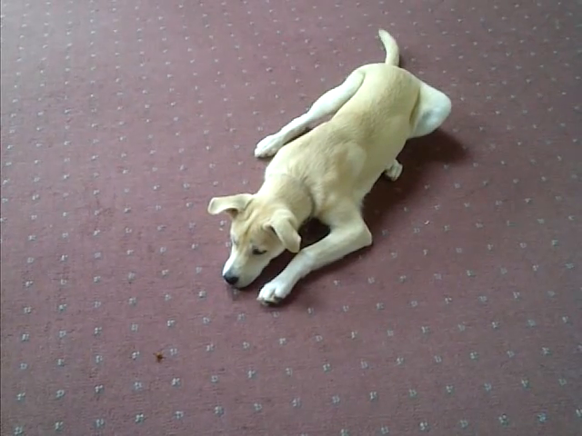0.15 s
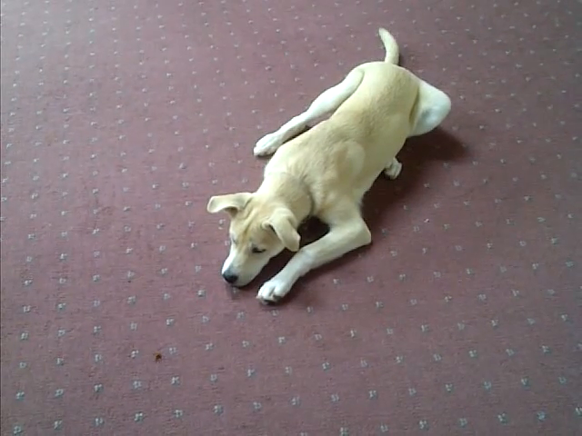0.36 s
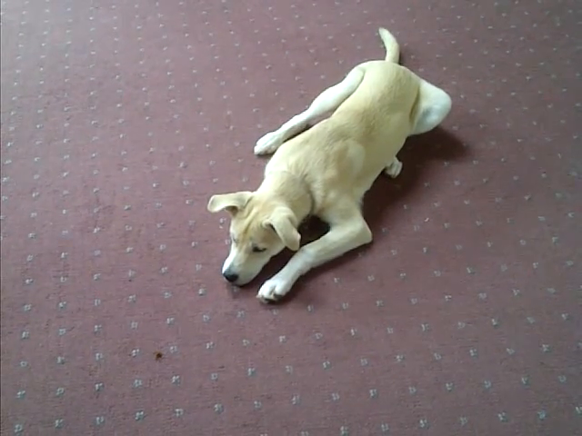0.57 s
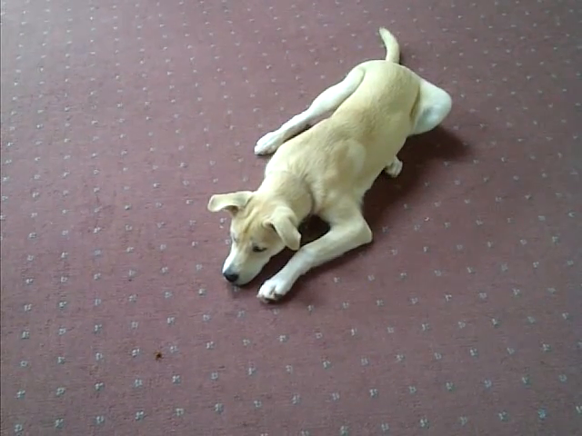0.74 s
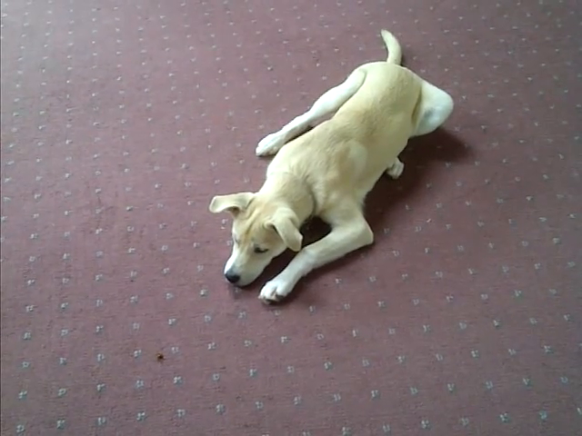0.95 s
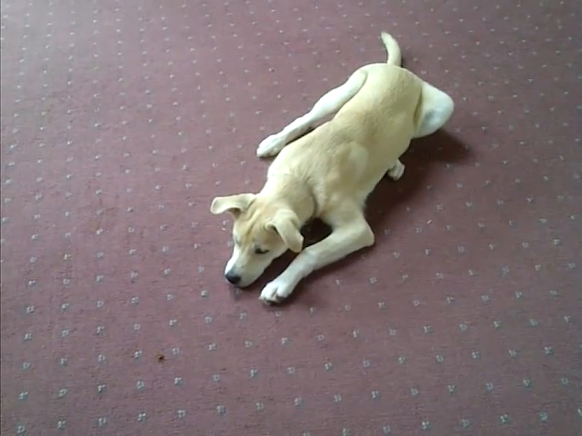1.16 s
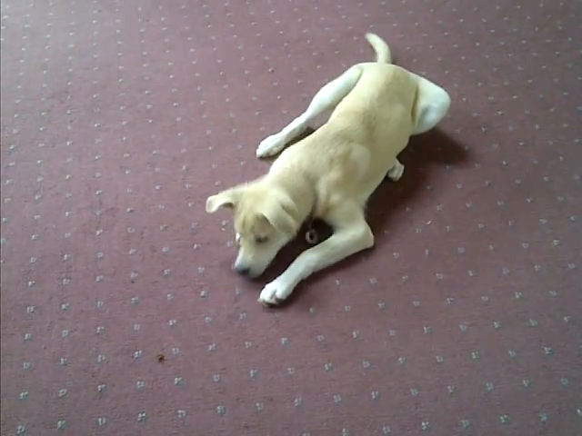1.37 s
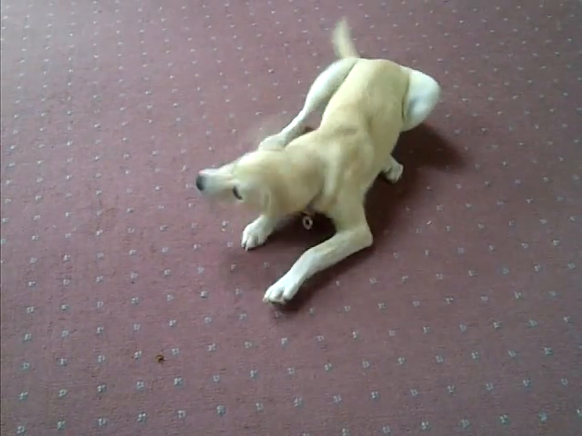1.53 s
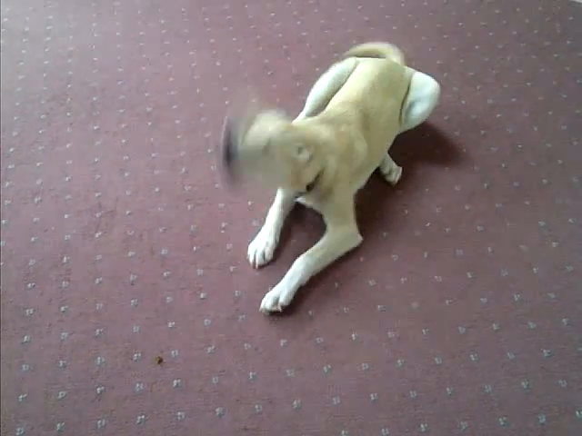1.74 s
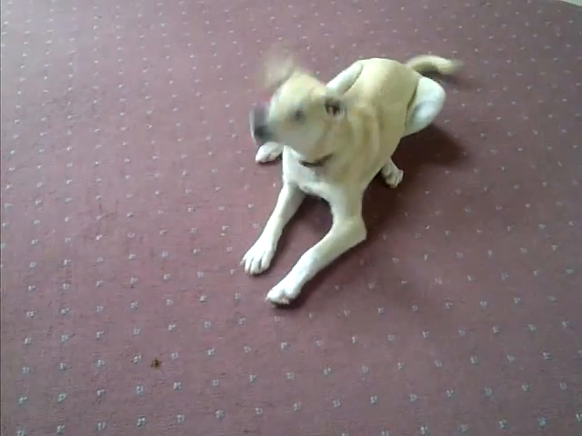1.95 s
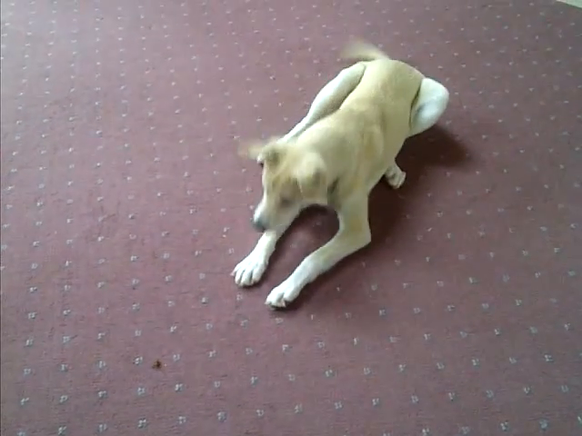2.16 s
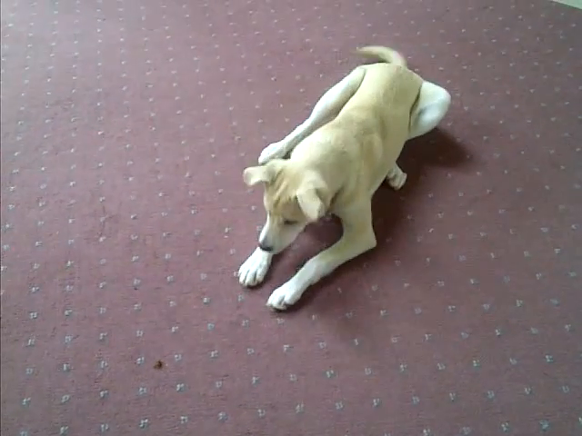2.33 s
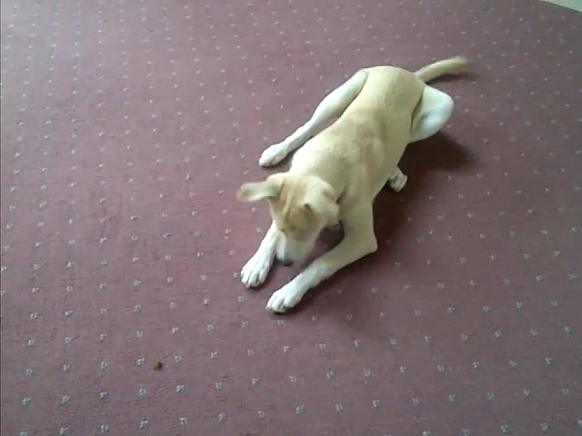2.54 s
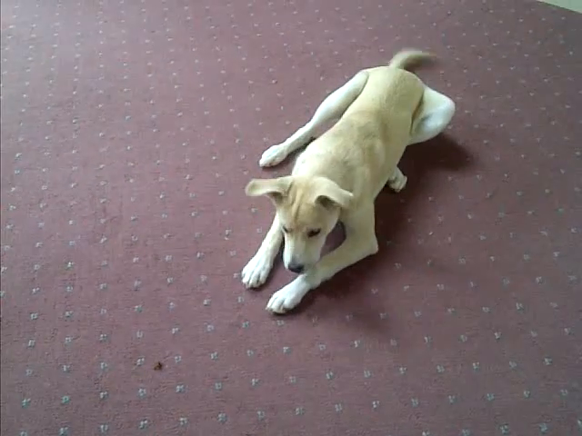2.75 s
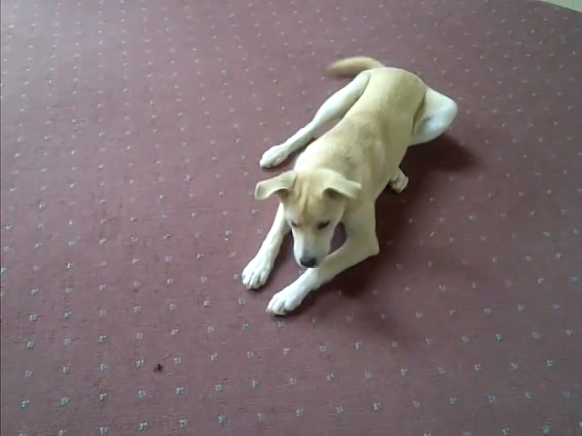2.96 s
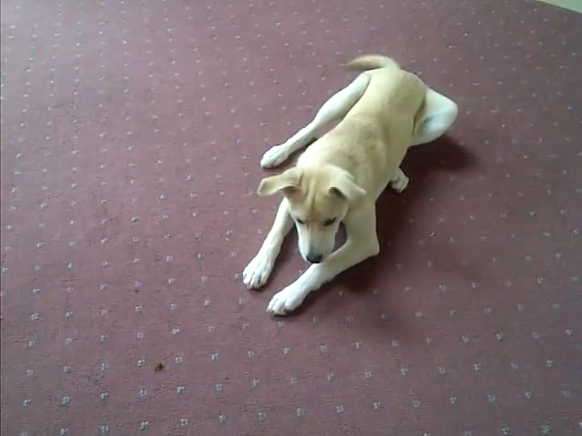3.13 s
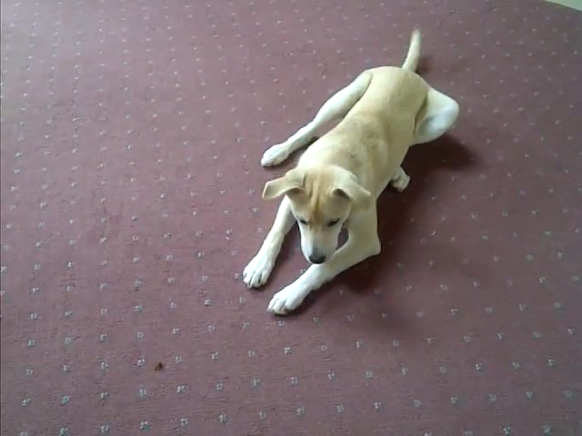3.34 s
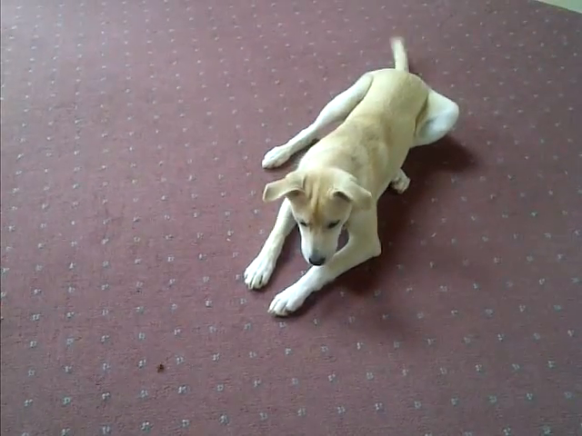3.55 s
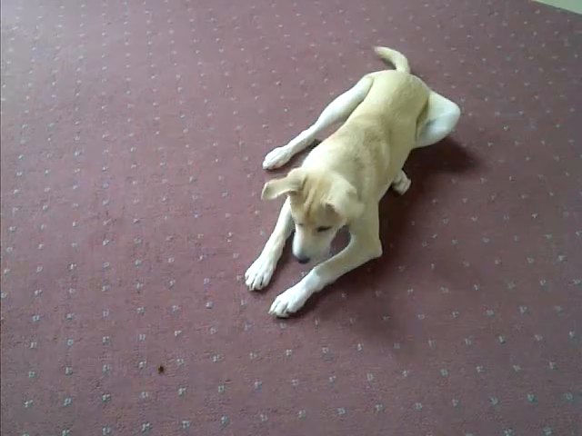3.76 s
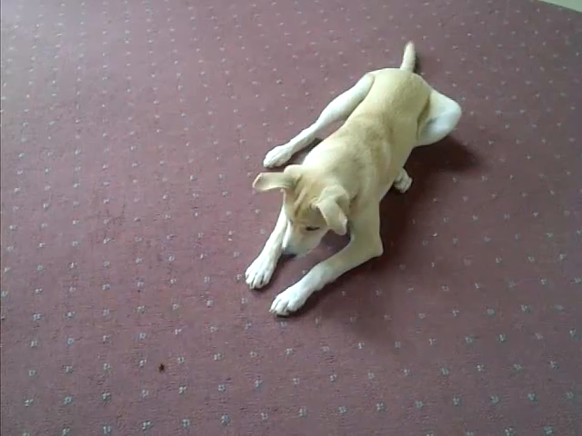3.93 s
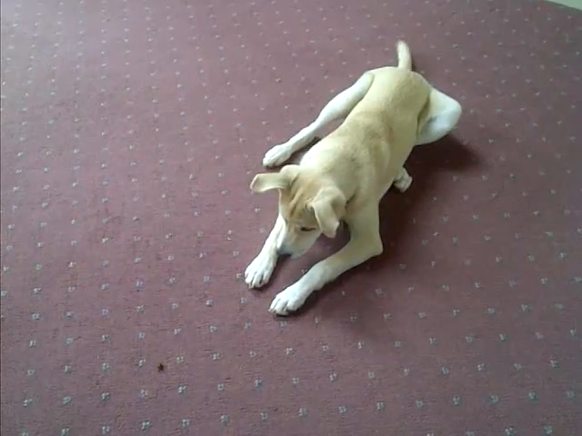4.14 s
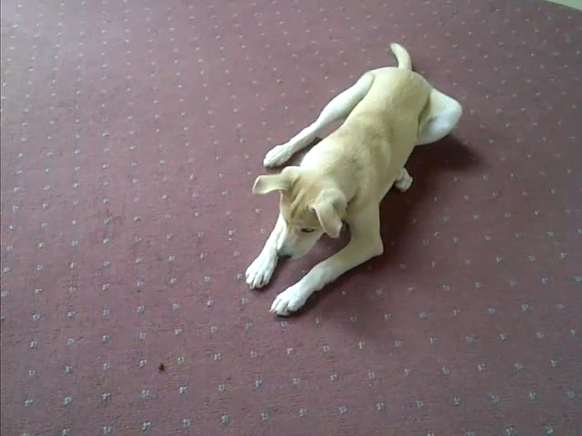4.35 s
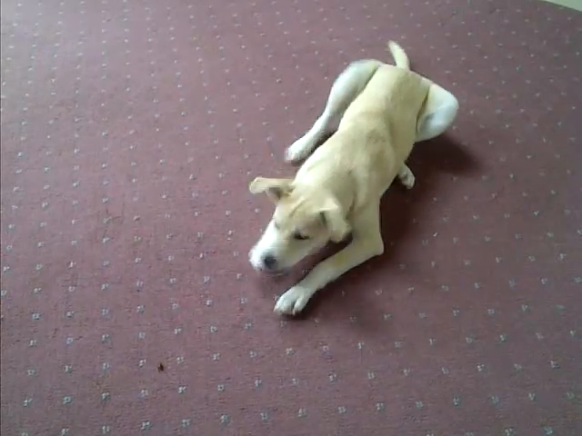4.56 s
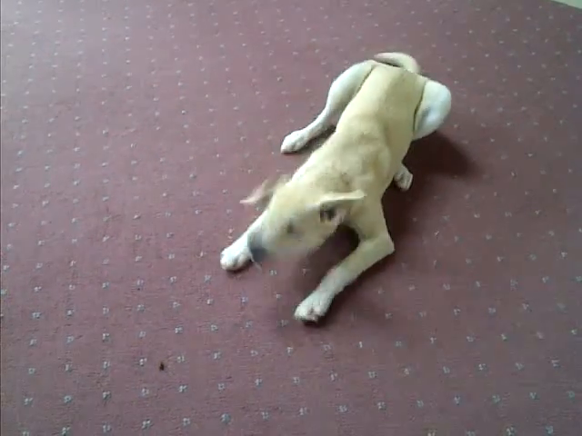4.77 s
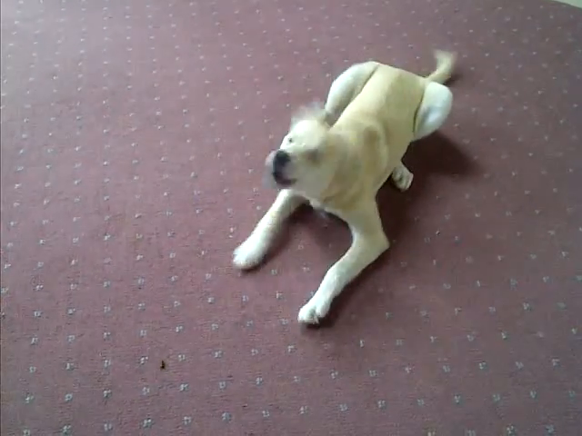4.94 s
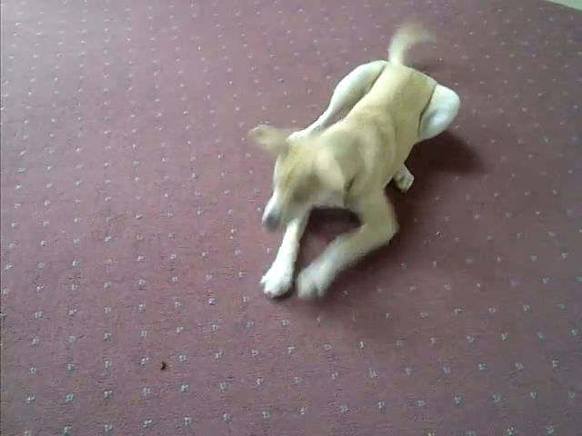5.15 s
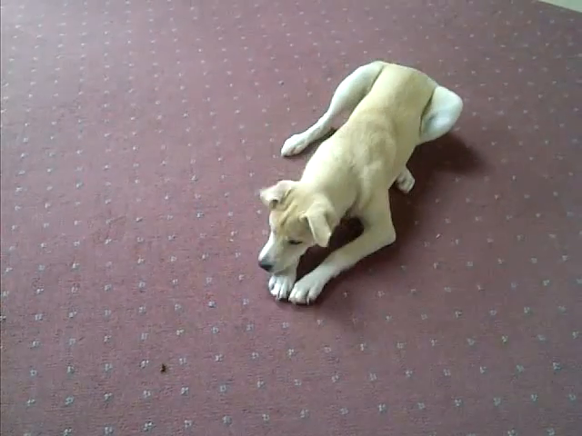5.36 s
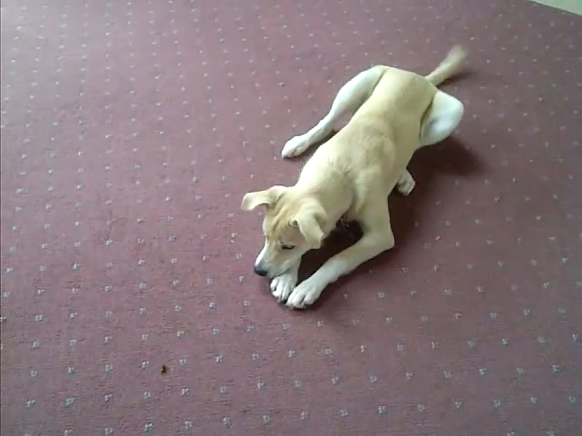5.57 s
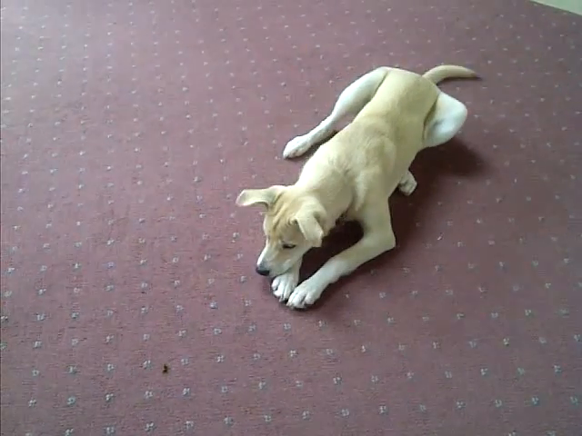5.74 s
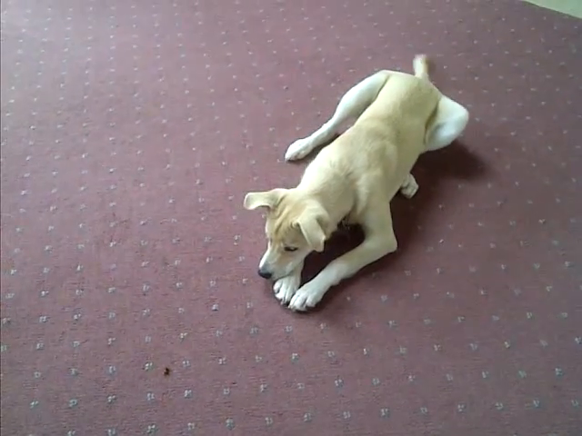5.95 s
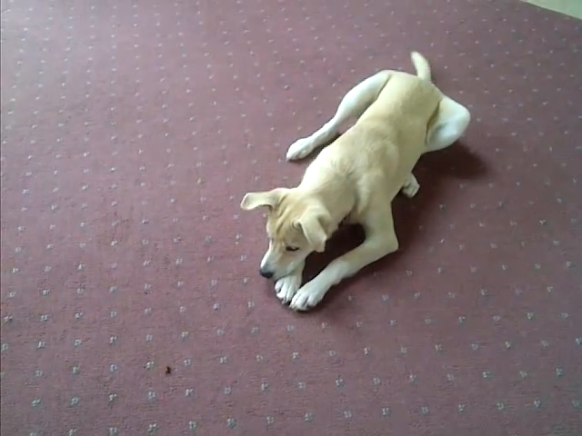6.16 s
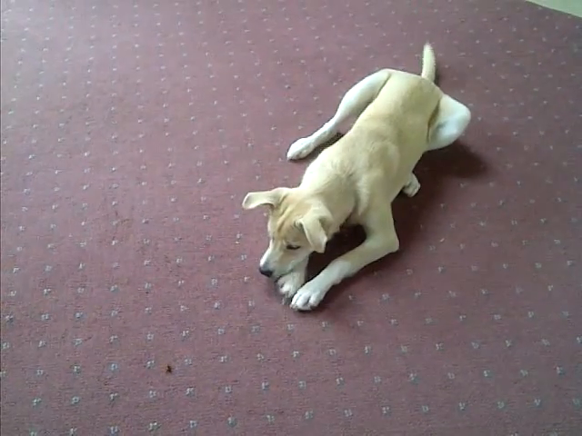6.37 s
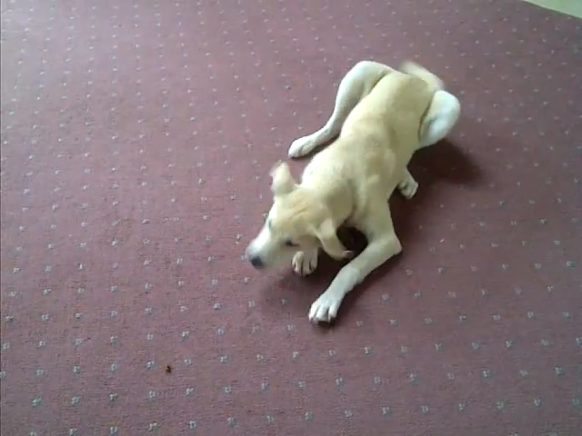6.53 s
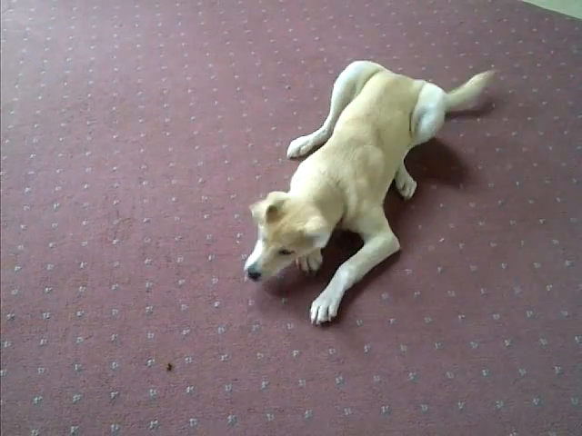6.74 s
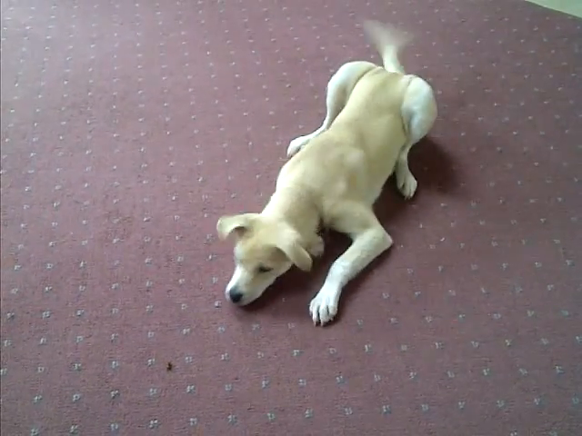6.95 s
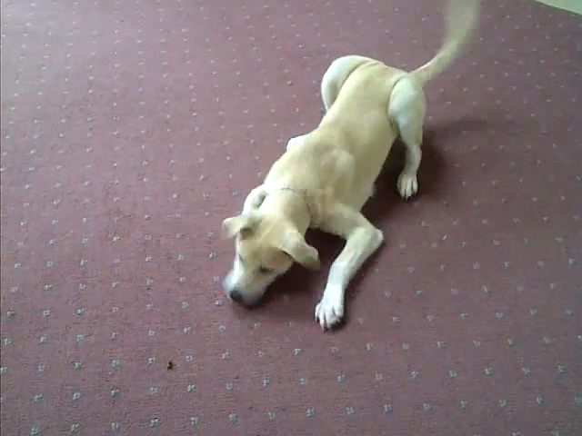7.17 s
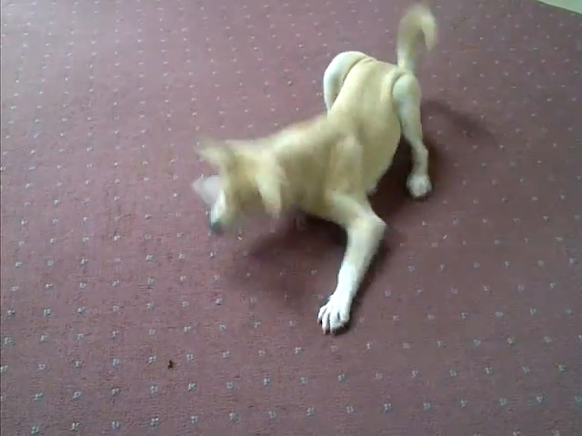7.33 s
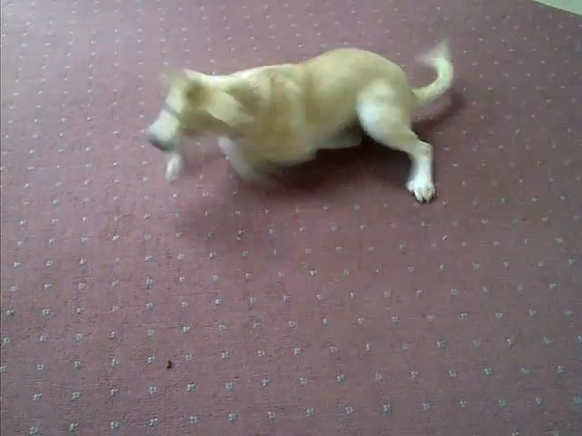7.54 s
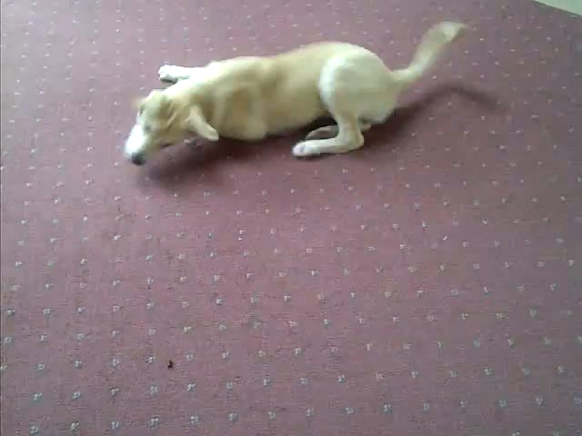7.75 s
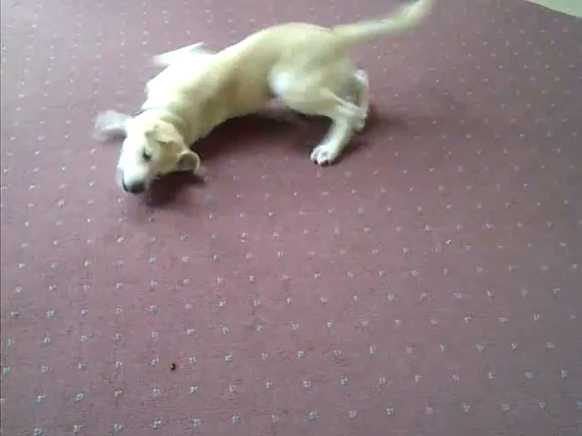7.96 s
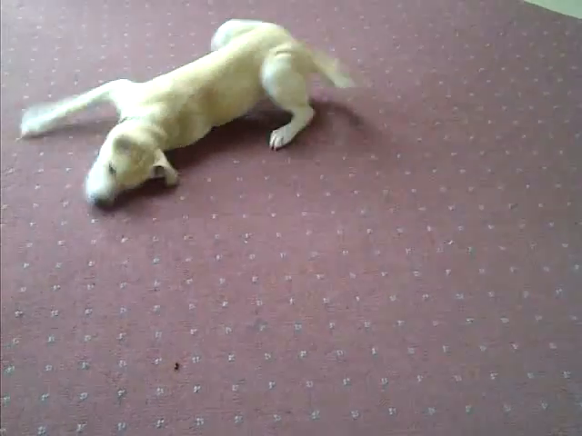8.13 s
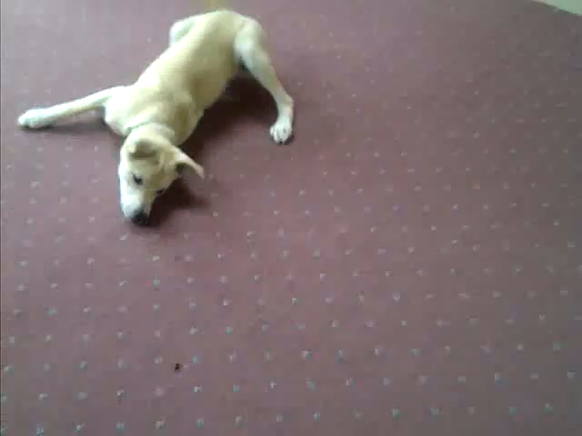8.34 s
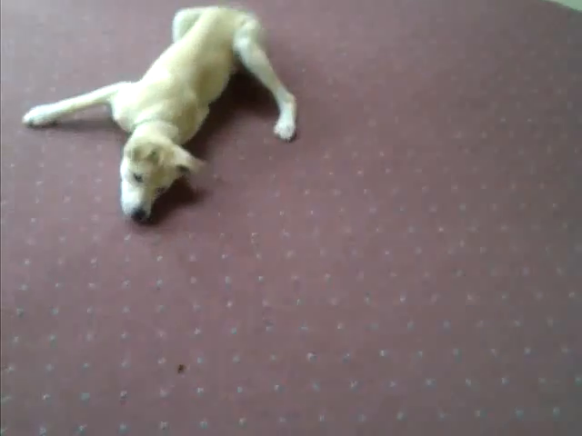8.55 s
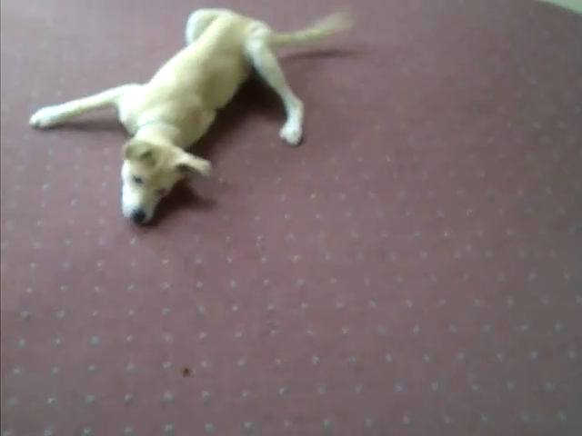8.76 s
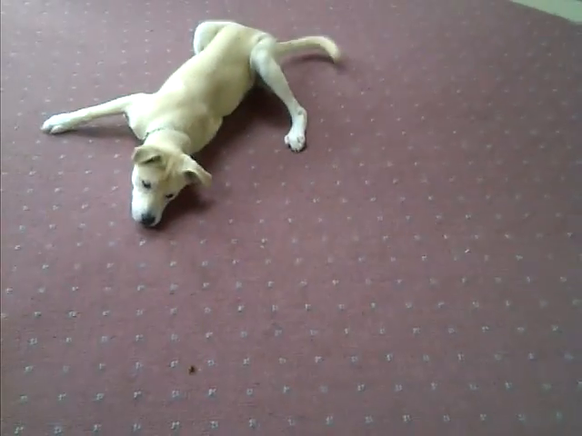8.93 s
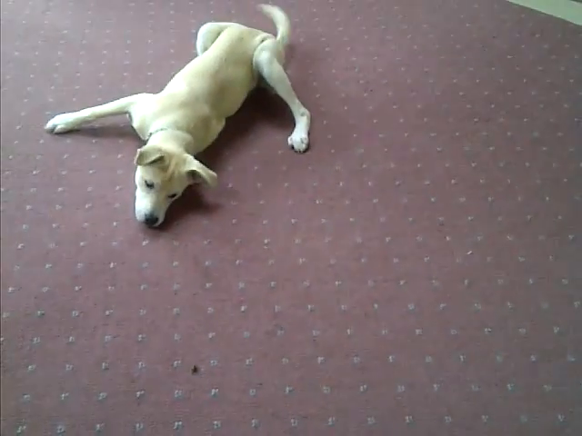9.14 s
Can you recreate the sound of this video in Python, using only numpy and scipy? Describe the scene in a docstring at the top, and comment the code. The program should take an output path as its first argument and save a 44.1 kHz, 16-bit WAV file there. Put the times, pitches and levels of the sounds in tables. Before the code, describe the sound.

A quiet room holds faint, dull hiss and a weak wavering low hum. At about 1.6 seconds a young dog gives a long, hoarse bark: a low chesty start cracks into a strained higher voice, sags and darkens. From 2.1 it sinks into a rattling growl fading until 3.5, with tiny collar tag clinks at 2.0 to 2.3 and a soft carpet rub near 2.6. At 4.65 and 4.9 come two quick barks almost joined, then a half-second growl and a clearer thin clink at 5.15. A short, clipped bark at 6.6 drops into a brief growl until 7.1. From 7.3 to 8.5 the dog pounces: soft paw thuds, claw scuffs, low floor bumps and swelling carpet rubs. Very faint bumps follow around 8.65, then near-silence and a faint tick at 9.07. Barks ring in the bare room; the small microphone is dull and holds the peaks down.

```python
"""Young dog barking and pouncing on a carpet

A long, a double and a short rough bark each sink into a growl: uneven pulses and breath noise, shaped
by throat and mouth bands. Sine modes make the collar tag clink; then the dog pounces, with shaped noise
for paws thudding and coat rubbing over the carpet, above faint hiss and hum.
A bare-walled room rings after each bark; a small, dull microphone with a limiter picks it up."""
import sys
import numpy as np
from scipy import signal
from scipy.fft import rfft, irfft, next_fast_len
from scipy.io import wavfile
from scipy.ndimage import uniform_filter1d

SR = 44100
rng = np.random.default_rng(int(sys.argv[2]) if len(sys.argv) > 2 else 0)


def persist_wave(psi):
    """Save psi, clipped to +-1, as 16-bit WAV."""
    counts = np.round(np.clip(psi, -1, 1) * 32767).astype(np.int16)
    wavfile.write(sys.argv[1], SR, np.atleast_2d(counts).T)


N = 410130
TIME = np.arange(N) / SR


def amp(db):
    """Turns decibels into gain."""
    return 10 ** (np.asarray(db) / 20)


def unit(x):
    """Scales to rms 1."""
    return x / np.sqrt(np.mean(x ** 2) + 1e-20)


def steady(x, size=1800):
    """Scales to a running rms of 1 over size samples."""
    return x / np.sqrt(abs(uniform_filter1d(x ** 2, size)) + 1e-20)


def blend(a, b, share):
    """Goes from a to b as share goes from 0 to 1."""
    return a + (b - a) * share


def gate(t, attack, release):
    """Straight attack, hold and release, in seconds."""
    return np.clip(t / attack, 0, 1) * np.clip((t[-1] - t) / release, 0, 1)


def read(points, hz):
    """Reads a table of frequency and value on a log-frequency axis."""
    f, value = np.transpose(points)
    return np.interp(np.log(hz + 1), np.log(f + 1), value)


def colour(x, points):
    """Filters by a table of frequency and gain in dB."""
    size = next_fast_len(len(x) + 2048)
    gain = amp(read(points, np.fft.rfftfreq(size, 1 / SR)))
    return irfft(rfft(x, size) * gain, size)[:len(x)]


def band(x, low_hz, high_hz, order=4):
    """Band-passes between two corner frequencies."""
    corners = [low_hz, min(high_hz, .45 * SR)]
    return signal.sosfilt(signal.butter(order, corners, "band", fs=SR, output="sos"), x)


def wander(count, hz):
    """Smooth random drift of rms 1, holding little movement faster than about hz."""
    return unit(colour(rng.standard_normal(count), [(hz, 0), (2 * hz, -40), (4 * hz, -100)]))


def resonate(x, hz, width):
    """A resonance of gain 1 that follows the curve hz: shift down, smooth, shift back up."""
    turn = np.exp(2j * np.pi * np.cumsum(hz) / SR)
    r = np.exp(-np.pi * width / SR)
    return 2 * (turn * signal.lfilter([1 - r], [1, -r], x / turn)).real


def add(mix, s, sound):
    """Mixes a sound in at time s, cut at the end of the mix."""
    part = mix[round(s * SR):][:len(sound)]
    part += sound[:len(part)]


def hush():
    """Faint even hiss of still air, and a wavering hum from a distant appliance."""
    # Spectrum of the still air. Each row: frequency in Hz, relative level in dB.
    air_spectrum = [(15, -40.5), (25, -15), (70, -9.5), (105, -10), (153, -8), (181, -5.5), (253, -7),
                    (354, -9.5), (777, -12.5), (855, -14), (963, -13.5), (2120, -19.5), (5910, -31),
                    (6350, -34), (7500, -35), (9750, -68.5), (16500, -120)]
    # Tones of the appliance. Each row: frequency in Hz, mean peak level in dB.
    hum_tones = [(104, -76.5), (142, -78.5)]
    out = amp(-66.5) * unit(colour(rng.standard_normal(N), air_spectrum))
    for hz, db in hum_tones:
        waver = 1 + 0.45 * wander(N, 5.4)
        out += amp(db) * waver * np.sin(2 * np.pi * hz * TIME)
    return out


def voice(t, hz, rough, mouth_hz, throat_db, mouth_db, rasp_db, head, jitter, slip, shimmer, flutter,
          half_tone, air, mouth_width, resonance_db):
    """Uneven pulses of the vocal folds and puffs of air pass the throat and the moving mouth."""
    # the pitch wavers, and single pulses come early or late
    wavering_hz = hz * (1 + jitter * rough * wander(len(t), 51.9))
    turns = np.cumsum(wavering_hz) / SR + slip * rough * wander(len(t), 80)
    folds = unit(sum(np.cos(2 * np.pi * k * turns) * (k * hz < 4000) for k in range(1, 33)))
    # a strained voice alternates strong and weak pulses, and their size varies
    folds *= 1 + half_tone * rough * np.cos(np.pi * turns)
    folds *= np.exp(shimmer * rough * np.tanh(wander(len(t), 75)))
    puffs = unit((1 + np.cos(2 * np.pi * turns)) * rng.standard_normal(len(t)))
    tone = colour(steady(folds), head)
    noise = colour(air * rough * puffs, head)
    # turbulence takes over towards the treble
    low = band(tone + 1.4 * noise, 55, 630)
    middle = band(tone + 4.2 * noise, 698, 1389)
    middle = middle + amp(resonance_db) * resonate(middle, mouth_hz, mouth_width)
    high = band(tone + 4.6 * noise, 1630, 9000)
    sound = amp(throat_db) * steady(low) + amp(mouth_db) * steady(middle) + amp(rasp_db) * steady(high)
    return sound * (1 + flutter * rough * wander(len(t), 29))  # loose lips and palate flap


def barks():
    """A hoarse chest voice winds up and breaks into a high one, which sags and dulls as the jaws close."""
    # The middle two make the double bark. Each row: start in seconds, end in seconds, wind-up in seconds,
    # pitch at the break in Hz, top pitch in Hz, last pitch before the final drop in Hz, open-mouth
    # resonance in Hz, jaw closing time constant in seconds, base levels of throat, mouth and rasp
    # in dB, fade over the breath in dB.
    bark_list = [(1.587, 2.18, 0.067, 469.4, 551, 460.9, 1284, 0.26, -18.5, -20, -19.5, -1),
                 (4.652, 4.935, 0.051, 401, 565.2, 513, 1141, 0.1, -14.5, -20, -18.5, -6.5),
                 (4.914, 5.174, 0.038, 480, 516.7, 444, 1185, 0.11, -20.5, -14, -28.5, -9),
                 (6.602, 6.784, 0.034, 490, 526.5, 504.7, 1112, 0.18, -17.5, -20, -25.5, -11.5)]
    # Colour of the head, one table a bark. Each row: frequency in Hz, gain in dB.
    bark_heads = [
        [(100, -28), (200, -19), (310, -9), (400, -9), (520, 1), (660, 1), (800, -7), (1100, -5.5), (1500, -4),
         (2000, -14.5), (2550, -23.5), (2900, -34), (3600, -35), (4300, -44), (6500, -45.5)],
        [(100, -31.5), (200, -19.5), (300, -11), (480, 0), (680, -3), (1100, 5), (1600, -6), (2100, -14),
         (2600, -27), (3000, -33), (3700, -38), (4300, -43.5), (5500, -42), (6500, -40.5)],
        [(100, -30), (200, -19), (290, -7.5), (400, -5.5), (520, 3), (680, -6), (950, -6), (1430, -9.5),
         (1800, -19), (2200, -13), (2900, -36), (3500, -33), (3720, -28.5), (4100, -47.5), (6500, -43.5)],
        [(100, -26), (250, -2.5), (380, -8.5), (520, -4), (660, 1), (900, -6), (1100, -4), (1430, -6.5),
         (1650, -6.5), (2150, -17.5), (2600, -13.5), (3100, -25.5), (4200, -42.5), (6300, -42.5)],
    ]
    chest_start_hz, chest_end_hz, chest_mouth_hz, shut_mouth_hz = 209.74, 333.9, 794, 825
    break_s, scoop_s, scoop_power, sag_power = 0.0035, 0.06, 1.3, 2.4
    unsteady_hz, quaver_share, heave_db = 16, 0.014, 1  # pitch quavers, throat heaves
    drop_share, drop_s = 0.08, 0.025  # the pitch drops as the voice gives out
    # roughness 0-1: hoarse at the onset, then clear, harshest a little later
    onset_rough, clear_rough, harsh_rough = 0.82, 0.25, 0.74
    hoarse_s, harsh_after_s, harsh_span_s = 0.042, 0.21, 0.14
    swell_db, swell_s, surge_db, surge_s = -24.5, 0.01, 5, 0.038
    chest_throat_db, chest_rasp_db, shut_rasp_db = -1.5, -22.5, -20
    harsh_mouth_db, harsh_rasp_db = 2, 3
    out = np.zeros(N)
    for row, head in zip(bark_list, bark_heads):
        start, end, wind_up, break_hz, top_hz, last_hz, open_hz, closing = row[:8]
        throat_db, mouth_db, rasp_db, fade_db = row[8:]
        t = np.arange(0, end - start, 1 / SR)
        broken = .5 + .5 * np.tanh((t - wind_up) / break_s)  # 0 in the chest voice, 1 in the high voice
        wound = np.minimum(t / wind_up, 1)
        since = np.maximum(t - wind_up, 0)  # seconds after the break
        spent = since / since[-1]  # share of the breath used
        jaw = np.exp(-since / closing)  # 1 wide open, 0 shut
        harsh = np.exp(-((since - harsh_after_s) / harsh_span_s) ** 2)

        chest_hz = blend(chest_start_hz, chest_end_hz, wound)
        sagging_hz = blend(top_hz, last_hz, spent ** sag_power)
        scoop = np.maximum(1 - since / scoop_s, 0) ** scoop_power
        quaver = 1 + quaver_share * wander(SR, unsteady_hz)[:len(t)]
        drop = 1 - drop_share * np.exp((t - t[-1]) / drop_s)
        high_hz = blend(sagging_hz, break_hz, scoop) * quaver * drop
        hz = blend(chest_hz, high_hz, broken)
        mouth_hz = blend(chest_mouth_hz, blend(shut_mouth_hz, open_hz, jaw), broken)
        hoarse = np.exp(-(t / hoarse_s) ** 2)
        rough = blend(blend(clear_rough, harsh_rough, harsh), onset_rough, hoarse)

        effort_db = swell_db * np.exp(-t / swell_s) + fade_db * spent
        heave = heave_db * wander(SR, unsteady_hz)[:len(t)]
        surge = blend(chest_throat_db, surge_db * np.exp(-since / surge_s), broken)
        throat = throat_db + effort_db + heave + surge
        mouth = mouth_db + effort_db + harsh_mouth_db * harsh
        rasp = rasp_db + effort_db + harsh_rasp_db * harsh
        rasp = rasp + chest_rasp_db * (1 - wound) + shut_rasp_db * (1 - jaw)
        sound = voice(t, hz, rough, mouth_hz, throat, mouth, rasp, head, jitter=.045, slip=.07,
                      shimmer=1.7, flutter=.2, half_tone=0.48, air=1.1, mouth_width=57, resonance_db=3)
        add(out, start, sound * gate(t, attack=0.018, release=0.032))
    return out


def overtones():
    """Narrow overtones ring unsteadily through the barks, many near the mouth resonance, gliding down."""
    # Each row: start in seconds, length in seconds, middle pitch in Hz, rms level before its fades in dB.
    overtone_list = [(1.61, 0.04, 662.4, -17), (1.639, 0.032, 1186, -20), (1.70, 0.091, 1112, -21.5),
                     (1.81, 0.11, 925, -18.5), (1.92, 0.04, 1274, -20.5), (2.04, 0.12, 1448, -27),
                     (2.08, 0.057, 2440, -35.5), (2.082, 0.062, 6550, -55), (2.10, 0.113, 874, -28),
                     (4.929, 0.055, 1429, -24), (4.96, 0.06, 1051, -21.5), (5.02, 0.14, 802.5, -21),
                     (6.614, 0.06, 613.6, -19.5), (6.615, 0.06, 1430, -23), (6.68, 0.07, 1057, -26)]
    octaves_per_s = -0.9
    out = np.zeros(N)
    for start, length, middle_hz, db in overtone_list:
        t = np.arange(0, length, 1 / SR)
        glide_hz = middle_hz * 2 ** (octaves_per_s * (t - length / 2))
        hz = glide_hz * (1 + 0.004 * wander(len(t), 90))
        tone = np.sin(2 * np.pi * np.cumsum(hz) / SR) * (1 + 0.3 * wander(len(t), 59))
        add(out, start, amp(db) * unit(tone) * signal.windows.tukey(len(t), .6))
    return out


def tag():
    """The collar tag knocks on its ring: a noise tick of metal on metal, then thin ringing sine modes."""
    # Each row: start in seconds, tick level in dB, ring level in dB.
    clinks = [(2.005, -49, -60), (2.205, -46.5, -68), (2.334, -55.5, -85), (5.15, -39, -51),
              (5.184, -50.5, -60.5), (5.246, -66, -67), (9.068, -53, -86)]
    # Modes of the metal. Each row: frequency in Hz, relative level in dB, 60 dB decay in seconds.
    tag_modes = [(3400, -4.5, .03), (4795, -0.5, 0.056), (5370, -7.5, 0.088), (6000, -2.5, 0.31),
                 (7000, -12, 0.049)]
    out, t = np.zeros(N), np.arange(SR // 3) / SR
    snap = np.exp(-t / .0035)
    ring = sum(amp(mode_db - 60 * t / t60) * np.sin(2 * np.pi * hz * t) for hz, mode_db, t60 in tag_modes)
    for s, tick_db, ring_db in clinks:
        tick = unit(band(rng.standard_normal(len(t)), 1500, 5500, order=2)) * snap
        add(out, s, amp(ring_db) * ring + amp(tick_db) * tick)
    return out


def growls():
    """Low and rattling: the pitch sinks, quickly at first, and the sound dulls as the jaws shut."""
    # Each row: start in seconds, end in seconds, first pitch in Hz, last pitch in Hz, sinking time
    # constant in seconds, roughness 0-1, base levels of throat, mouth and rasp in dB, fade in dB.
    growl_list = [(2.145, 3.53, 228.1, 90.7, 0.16, 0.61, -29.5, -41, -53, -20),
                  (5.126, 5.579, 196, 97.78, 0.47, 0.59, -22, -27, -46.5, -18),
                  (6.74, 7.124, 167.5, 152, 0.524, 0.53, -17.5, -31.5, -53, -9)]
    # Colour of the head with jaws nearly shut, one table a growl. Each row: frequency in Hz, gain in dB.
    growl_heads = [
        [(55, -22), (95, -8), (140, -6.5), (200, 2.5), (310, -3), (365, -5), (430, -24), (620, -15),
         (900, -15.5), (1200, -10.5), (1450, -33), (1900, -28.5), (2500, -20), (3200, -36.5), (6500, -38)],
        [(55, -21), (105, -6.5), (190, 0), (310, 7.5), (420, -14.5), (600, -11.5), (820, -19), (1100, -27),
         (1700, -33), (2300, -28.5), (3200, -35.5), (6500, -45.5)],
        [(80, -26), (160, -13.5), (250, -0.5), (305, -2.5), (335, 4), (410, -6), (480, -16.5), (650, -6),
         (820, -12.5), (950, -6.5), (1250, -33.5), (1450, -20), (1850, -34.5), (2800, -38.5), (6500, -50.5)],
    ]
    steady_sag_share = 0.14  # share of the fall that is spread over the whole growl
    waver_share, waver_hz = 0.02993, 9
    swell_db, swell_s = -10.5, 0.06
    # as the pitch sinks, the mouth resonance drops and the upper bands fade
    reference_hz, reference_mouth_hz, mouth_hz_per_octave = 160, 920, 170
    mouth_db_per_octave, rasp_db_per_octave = 18, 11.5
    out = np.zeros(N)
    for row, head in zip(growl_list, growl_heads):
        start, end, first_hz, last_hz, sinking, rough = row[:6]
        throat_db, mouth_db, rasp_db, fade_db = row[6:]
        t = np.arange(0, end - start, 1 / SR)
        spent = t / t[-1]
        quick_fall = np.expm1(-t / sinking) / np.expm1(-t[-1] / sinking)
        sunk = blend(quick_fall, spent, steady_sag_share)
        waver = 1 + waver_share * wander(SR * 2, waver_hz)[:len(t)]
        hz = blend(first_hz, last_hz, sunk) * waver
        octaves = np.log2(hz / first_hz)
        effort_db = fade_db * spent
        mouth_hz = reference_mouth_hz + mouth_hz_per_octave * np.log2(hz / reference_hz)
        throat = throat_db + effort_db + swell_db * np.exp(-t / swell_s)
        mouth = mouth_db + effort_db + mouth_db_per_octave * octaves
        rasp = rasp_db + effort_db + rasp_db_per_octave * octaves
        sound = voice(t, hz, rough, mouth_hz, throat, mouth, rasp, head, jitter=.055, slip=.055,
                      shimmer=.8, flutter=.55, half_tone=0.17, air=.9, mouth_width=73, resonance_db=-16.0)
        add(out, start, sound * gate(t, attack=0.025, release=0.044))
    return out


def rubs():
    """Carpet fibres catch and let go in clumps under the sliding dog; each stroke swells and dies away."""
    # Strokes of coat and pads. Each row: start in seconds, rise in seconds, fall in seconds,
    # weight level in dB, scrape level in dB, bristle level in dB, all three before the swell and fall.
    strokes = [(2.565, 0.03, 0.14, -38.5, -44.5, -70), (2.61, 0.031, 0.23, -42, -49, -66.5),
               (3.055, 0.017, 0.073, -59, -64, -70), (6.52, 0.091, 0.022, -53.5, -55, -57.5),
               (7.04, 0.062, 0.25, -57, -51, -58), (7.318, 0.026, 0.18, -55, -52.5, -65),
               (7.413, 0.0038, 0.11, -41.5, -44.5, -45), (7.529, 0.042, 0.068, -44.5, -50.5, -52.5),
               (7.6, 0.008, 0.39, -43, -44, -52), (7.816, 0.064, 0.095, -41, -39, -46.5),
               (7.968, 0.0073, 0.23, -52, -37.5, -54), (8.0, 0.041, 0.14, -38.5, -35, -45),
               (8.17, 0.051, 0.26, -42, -49, -53.5), (8.3, 0.042, 0.16, -43, -45.5, -56)]
    # Colour of the carpet. Each row: frequency in Hz, gain in dB.
    carpet = [(130, -16.5), (250, -9), (400, -2.5), (750, -2.5), (1050, 1), (1400, 0.5), (2000, -8),
              (3000, -6), (3800, -10.5), (4600, -15), (6600, -27)]
    fall_db = -26  # how far a stroke dies away over its fall
    out = np.zeros(N)
    for start, rise, fall, weight_db, scrape_db, bristle_db in strokes:
        t = np.arange(0, rise + fall, 1 / SR)
        clumps = amp(2.7 * wander(len(t), 60))
        grain = colour(rng.standard_normal(len(t)) * clumps, carpet)
        weight = amp(weight_db) * unit(band(grain, 150, 613))
        scrape = amp(scrape_db) * unit(band(grain, 747, 2200))
        bristle = amp(bristle_db) * unit(band(grain, 2200, 8000))
        dying = amp(fall_db * np.maximum(t - rise, 0) / fall)
        add(out, start, (weight + scrape + bristle) * gate(t, rise, 0.01) * dying)
    return out


def paws():
    """Each landing of paws or chest is a soft thud, a scuff of claws in the pile and a boom of the floor."""
    # Each row: start in seconds, thud level in dB, scuff level in dB, boom level in dB,
    # 60 dB decay in seconds; the levels are those before the decay.
    landings = [(7.415, -33, -27, -76, 0.033), (7.605, -23, -36.5, -64, 0.048),
                (7.652, -32.5, -51, -45, 0.13), (7.814, -31, -45, -36.5, 0.17),
                (7.829, -29.5, -43.5, -33, 0.44), (7.974, -49, -31, -60, 0.053),
                (8.109, -27, -55, -71, 0.067), (8.179, -31, -73, -64, 0.09), (8.303, -26, -65, -42, 0.045),
                (8.333, -27.5, -41, -62, 0.029), (8.642, -49.5, -62, -60, 0.15),
                (8.667, -52, -69, -66.5, 0.22)]
    # Colours of the soft thud and of the scuffing claws. Each row: frequency in Hz, relative level in dB.
    thud_colour = [(80, -42), (170, -15.5), (300, 7), (430, 8), (650, -2.5), (1200, -23), (2500, -49),
                   (6000, -43)]
    scuff_colour = [(300, -13), (900, 10.5), (1500, 8), (2500, -1), (3800, -7), (5000, -17), (6800, -30)]
    out, t = np.zeros(N), np.arange(SR // 3) / SR
    attack = 1 - np.exp(-t / .0015)
    for s, thud_db, scuff_db, boom_db, t60 in landings:
        thud, scuff, boom = rng.standard_normal((3, len(t)))
        blow = amp(thud_db) * unit(colour(thud, thud_colour))
        blow += amp(scuff_db) * unit(colour(scuff, scuff_colour))
        blow += amp(boom_db) * unit(band(boom, 114, 230, order=2))
        add(out, s, blow * amp(-60 * t / t60) * attack)
    return out


def room(x, wet_db, direct_db):
    """Dense reflections of random sign, each band dying at its own speed, and a few standing waves."""
    # Decay of the reflections. Each row: frequency in Hz, 60 dB decay in seconds.
    decay_times = [(100, 0.47), (300, 0.56), (600, 0.51), (1200, 0.51), (2500, 0.46), (6500, 0.43)]
    # The reflections thin out towards the bass. Each row: frequency in Hz, gain in dB.
    diffuse = [(80, -12.5), (170, -6.5), (300, -3.5), (500, -1.5), (800, 0)]
    # Standing waves between the walls. Each row: frequency in Hz, width in Hz, relative level in dB.
    standing_waves = [(103, 8.6, -2), (205.2, 32, -8), (272, 6.7, -7.5), (311, 8, -8), (506.8, 11, -5.5),
                      (592, 9.8, -9.5), (638, 17, -2.5), (910, 8.9, -7.5), (1114, 6.5, -4),
                      (1453, 10, -3.5)]
    t = TIME[:SR]
    # about 3000 reflections a second, after a gap of 4 ms
    taps = rng.choice([-1., 1.], SR) * (rng.random(SR) < 3000 / SR) * (t > .004)
    hz, frame_s, z = signal.stft(taps, SR, nperseg=256)
    decay = amp(-60 * frame_s / read(decay_times, hz)[:, None])
    tail = signal.istft(z * decay, SR, nperseg=256)[1][:SR]
    tail = colour(tail / np.linalg.norm(tail), diffuse)
    for mode_hz, width, db in standing_waves:
        ringing = np.exp(-np.pi * width * t) * np.cos(2 * np.pi * mode_hz * t)
        tail = tail + amp(db) * 2 * np.pi * width / SR * ringing
    return amp(direct_db) * x + amp(wet_db) * signal.fftconvolve(x, tail)[:N]


def scene():
    """The voice fills the room; sounds on the carpet and at the collar stay drier."""
    calls = room(barks() + overtones(), wet_db=-4.5, direct_db=-4.0)
    collar = room(tag(), wet_db=-10, direct_db=1.5)
    # growls are aimed at the floor, so less of them arrives directly
    grumble = room(growls(), wet_db=-1.5, direct_db=-7)
    movement = room(paws() + rubs(), wet_db=-4.5, direct_db=-3.5)
    return (hush() + calls + collar + grumble + movement)[None]


def record(dry):
    """A quick limiter holds loud sounds level and rounds peaks; the microphone loses the top treble."""
    # Response of the microphone. Each row: frequency in Hz, gain in dB.
    microphone = [(20, 0.5), (6700, -0.5), (7300, -16), (8100, -22)]
    limit_db, recovery_db_per_s, ceiling, edge_hz = -12.0, 70, .58, 8200
    power_db = 10 * np.log10(abs(uniform_filter1d(dry[0] ** 2, size=300)) + 1e-12)
    # the tracked level jumps up with the sound and recovers at a steady speed
    fall = TIME * recovery_db_per_s
    tracked_db = np.maximum.accumulate(power_db + fall) - fall
    over_db = np.maximum(tracked_db - limit_db, 0)
    held = dry[0] / amp(uniform_filter1d(over_db, size=150))
    rounded = held / (1 + (held / ceiling) ** 8) ** (1 / 8)
    low_pass = signal.firwin(511, edge_hz, window=("kaiser", 9), fs=SR)
    return signal.oaconvolve(colour(rounded, microphone), low_pass, "same")[None]


dry = scene()
out = record(dry)
persist_wave(out)
```